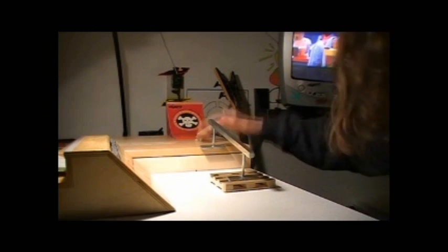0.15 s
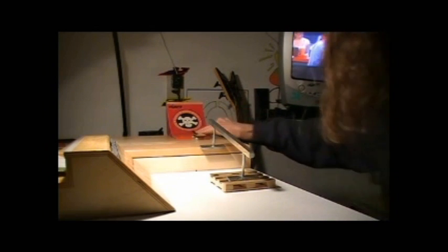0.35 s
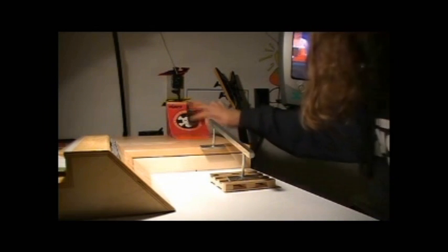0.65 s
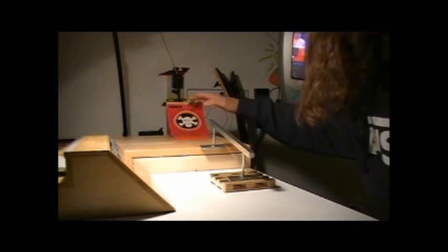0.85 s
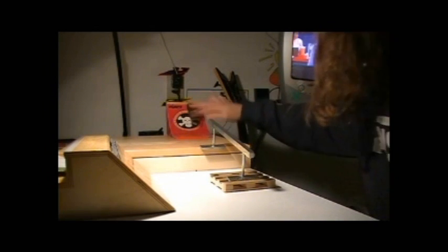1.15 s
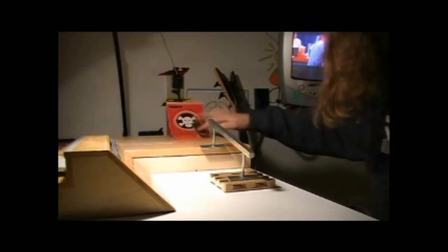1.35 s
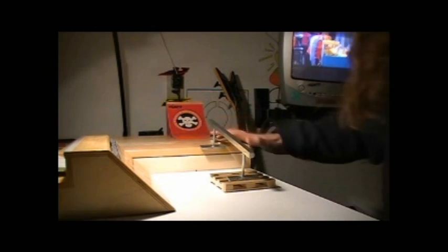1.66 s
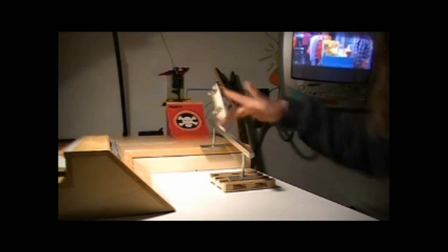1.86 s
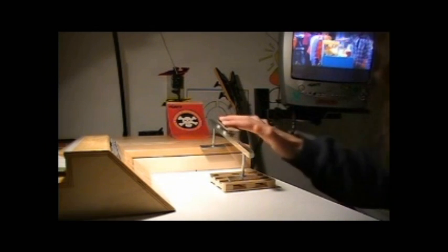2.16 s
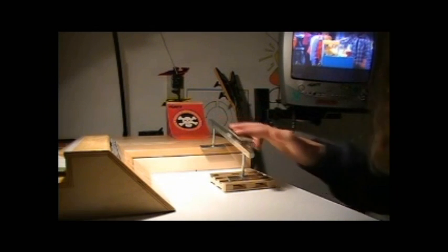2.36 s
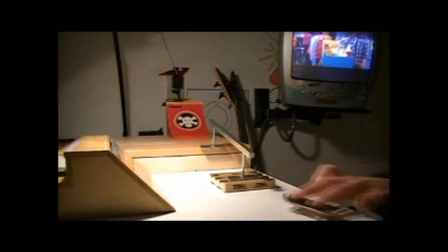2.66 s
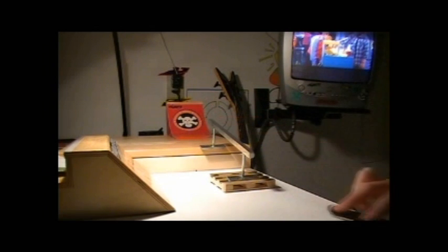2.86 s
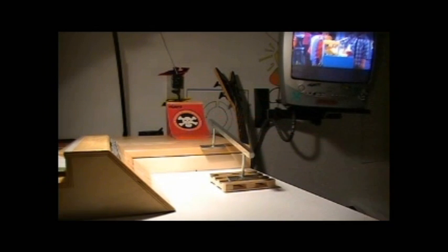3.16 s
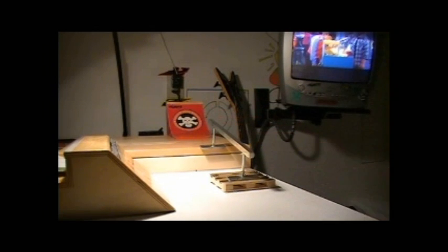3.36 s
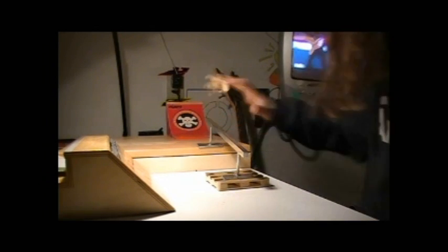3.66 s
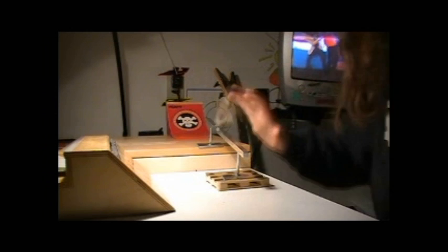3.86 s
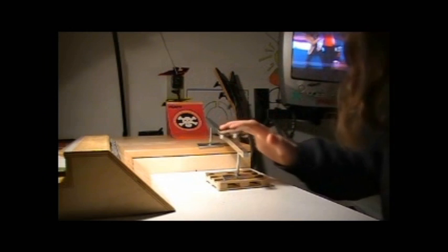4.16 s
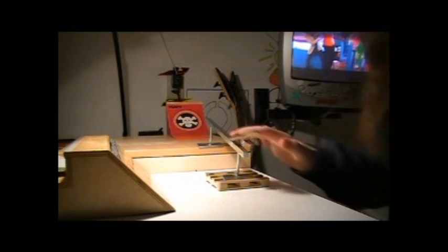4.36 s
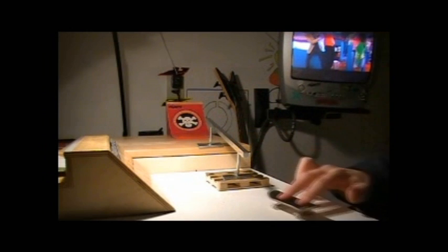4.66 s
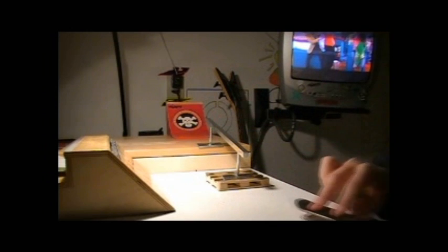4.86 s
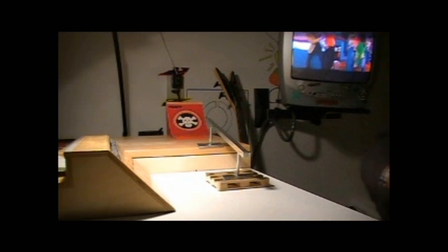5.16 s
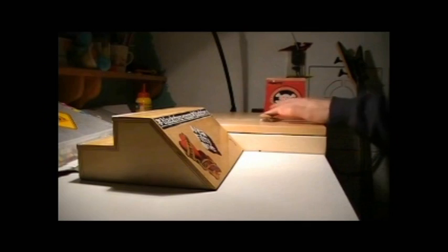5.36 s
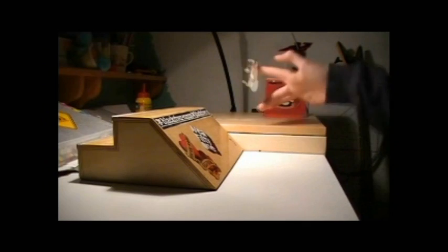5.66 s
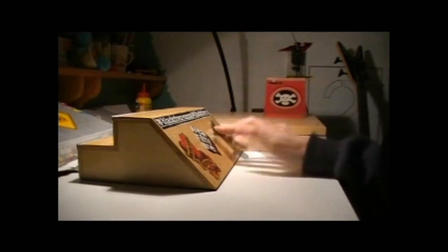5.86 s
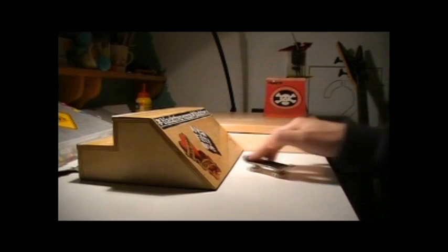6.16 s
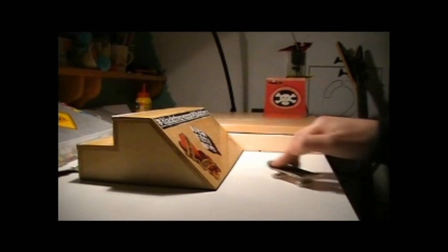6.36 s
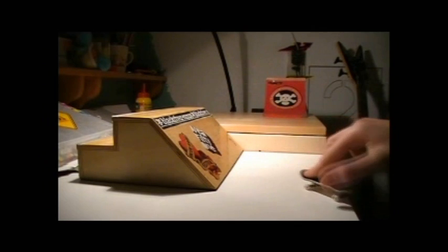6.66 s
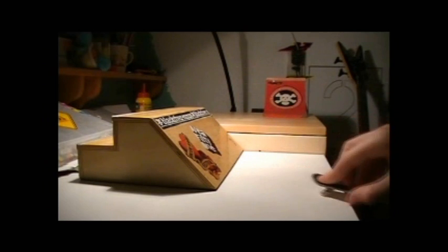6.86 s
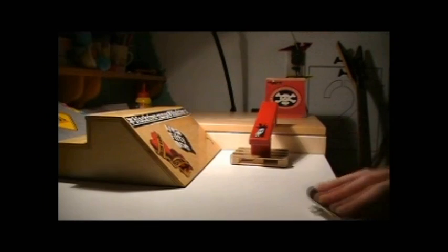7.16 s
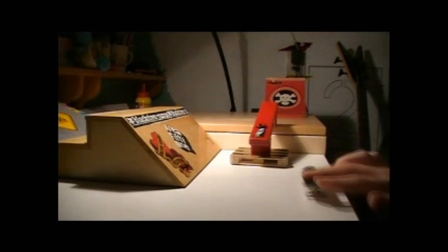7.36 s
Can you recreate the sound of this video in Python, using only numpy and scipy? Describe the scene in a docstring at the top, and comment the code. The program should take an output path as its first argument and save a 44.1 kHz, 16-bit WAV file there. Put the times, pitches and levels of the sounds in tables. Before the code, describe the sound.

Finger-sized skateboard tricks: bright hard clicks, short wheel rumbles on wood, a small rail singing, hollow box knocks, and one abrupt cut near the end.

```python
"""Wheels of a finger-sized skateboard roll over hollow wooden boxes and a desk: grit rings wood, deck and trucks.
Trucks and deck edge scrape by stick-slip, and sharp clacks join a click, a bright rattle and a dull thud.
Trucks strike a small metal rail and make it sing; a ramp box and a ledge ring as struck modes.
Late on, the rolling and the room's tail break off abruptly.
A small room adds dying reflections over steady noise and a few thin tones."""
import sys
import numpy as np
from scipy import signal
from scipy.fft import rfft, irfft, next_fast_len
from scipy.io import wavfile

SR = 44100
rng = np.random.default_rng(int(sys.argv[2]) if len(sys.argv) > 2 else 0)


def pcm_store(signal):
    """Save signal as 16-bit PCM."""
    levels = np.round(np.clip(np.atleast_2d(signal), -1, 1) * 32767)
    wavfile.write(sys.argv[1], SR, levels.astype(np.int16).T)


N = 331191   # length [samples]
CUT_S = 7.064   # the rolling and the room's tail break off here

# Modes of the desk top, shaken by the rolling and by the clacks:
# (frequency [Hz], width [Hz], level relative to the wood under the rolling [dB])
DESK_MODES = [(105, 10, -29), (153.4, 22, -13), (208, 59, -18)]
# Stereo width, what differs left and right: (frequency [Hz], side minus mid [dB])
SIDE_SPECTRUM = [(60, -20), (150, -21), (500, -13.5), (1500, -17.5), (3800, -10), (4200, -62), (14000, -33)]


def from_db(db):
    """Logarithmic level: decibels to amplitude gain."""
    return 10 ** (np.asarray(db) / 20)


def rms_one(x):
    """Normalisation of mean power: scale to unit rms."""
    return x / np.sqrt(np.mean(x ** 2) + 1e-20)


def at_hz(points, hz):
    """Spectral envelope: interpolate levels in dB along a log-frequency axis."""
    points = np.array(points)
    return np.interp(np.log(hz), np.log(points[:, 0]), points[:, 1])


def coloured(x, spectrum):
    """Linear filtering: shape a steady noise by a spectrum; rms 1 over all channels together."""
    size = next_fast_len(N)
    hz = np.maximum(np.arange(size // 2 + 1) * SR / size, 1)
    shaped = irfft(rfft(x, size) * from_db(at_hz(spectrum, hz)), size)
    return rms_one(shaped[..., :N])


def resonance(x, hz, width_hz):
    """Forced damped oscillator: a two-pole band, unit rms."""
    radius = np.exp(-np.pi * width_hz / SR)
    poles = [1, -2 * radius * np.cos(2 * np.pi * hz / SR), radius * radius]
    return rms_one(signal.lfilter([1, 0, -1], poles, x))


def ring(clicks, hz, t60):
    """Free damped oscillation: a unit click sets a dying sine of initial height 1 ringing."""
    radius = from_db(-60 / (t60 * SR))
    angle = 2 * np.pi * hz / SR
    poles = [1, -2 * radius * np.cos(angle), radius * radius]
    return signal.lfilter([0, np.sin(angle)], poles, clicks + 1e-18)


def struck(blows, modes):
    """Modal superposition: every blow sets all modes of one object ringing."""
    clicks = np.zeros(N)
    for s, db in blows:
        clicks[int(s * SR)] = from_db(db)
    return sum(from_db(db) * ring(clicks, hz, t60) for hz, db, t60 in modes)


def grit(per_s, spread_db):
    """Random impulse excitation: sparse tiny bumps of uneven size; rms 1."""
    spread = from_db(spread_db * np.minimum(rng.exponential(1, N), 5))
    sizes = spread * rng.standard_normal(N)
    return rms_one(sizes * (rng.random(N) < per_s / SR))


def rolling():
    """Roughness excitation: grit shakes the panel under the board, the desk, the deck and the wheels."""
    # modes of boxes and desk: (frequency [Hz], width [Hz], level [dB])
    panel_modes = [(263.6, 31, 3), (338.7, 42, 2.5), (398, 31, 2), (478.6, 76, 3.5), (564, 31, 1.5),
                   (654, 57, 1), (762, 42, 5), (853, 27, 3)]
    # modes of the deck: (frequency [Hz], width [Hz], level [dB])
    deck_modes = [(984, 102, 5), (1205, 130, 3.5), (1440, 110, 4), (1517, 44, 0.5), (1647, 157, 1),
                  (2035, 220, 6), (2505, 220, 3)]
    # hiss of the wheels: (frequency [Hz], relative level per Hz [dB])
    wheel_spectrum = [(1290, -15.5), (2200, -3.5), (3640, 7), (5080, 1), (6610, 4.5), (7250, 1), (8270, 2),
                      (9140, -2), (10800, -17), (12200, -55.5), (12600, -38), (13700, -75), (14000, -84)]
    wood_follows, deck_follows = .65, .8   # share of the wheels' swell and fade, in dB
    desk_softer_s, desk_softer_db = 5.33, -8.0   # from here on the desk hums less under the rolling

    t, under, (wood_db, wood_hz, deck_db, deck_hz, wheel_db) = motion()
    wood_power = from_db(2 * (wood_db - wood_follows * under)) + 1e-30
    deck_power = from_db(2 * (deck_db - deck_follows * under)) + 1e-30
    wheel_power = from_db(2 * (wheel_db - under)) + 1e-30

    def smooth(values):
        """Linear interpolation from the motion's time steps to samples."""
        return np.interp(np.arange(N) / SR, t, values)

    def pitch(power, hz):
        """Power-weighted mean: the loudest motion sets the pitch."""
        return smooth(np.sum(power * hz, 0) / np.sum(power, 0))

    def level(power):
        """Incoherent addition: powers of all motions add."""
        return smooth(np.sqrt(np.sum(power, 0)))

    bumps = grit(per_s=2500., spread_db=1.0)
    fine = grit(per_s=12000., spread_db=1.5)
    wood = body(bumps, panel_modes, pitch(wood_power, wood_hz), focus_db=12.5, rest_db=8.0)
    desk_gain = from_db(desk_softer_db * (np.arange(N) > desk_softer_s * SR))
    desk = sum(from_db(db) * resonance(bumps, hz, width) for hz, width, db in DESK_MODES)
    wood = wood + desk_gain * desk
    deck = body(bumps, deck_modes, pitch(deck_power, deck_hz), focus_db=35.0, rest_db=7.5)
    wheels = coloured(fine, wheel_spectrum)
    return level(wood_power) * wood + level(deck_power) * deck + level(wheel_power) * wheels


def motion():
    """Exponential growth and decay: dB under each motion's loudest moment, with its levels and pitches."""
    # Rolls, slides and sudden contacts that run on; at 3.426 s and 5.329 s the rolling sets in at full level at
    # once: (loudest time [s], wheels' time to gain the last 20 dB [s], run-on until lift-off [s], wood level
    # [dB], wood pitch [Hz], deck level [dB], deck pitch [Hz], wheel level [dB])
    run_ons = [(0.03, .3, .06, -56, 270, -55, 2300, -27), (0.44, .12, .25, -24, 310, -34.5, 1050, -42),
               (0.88, .1, .3, -59, 480, -66, 1300, -61), (1.18, .08, .012, -42, 480, -44, 1300, -56),
               (1.428, .15, .1, -22, 414, -34, 1310, -33), (1.62, .25, .07, -38, 705, -29, 1440, -33),
               (2.47, .22, .05, -53, 627, -38.5, 2360, -23), (2.75, .1, .25, -49, 460, -41, 1620, -44),
               (3.04, .08, .03, -42, 636, -39, 1370, -32.5), (3.066, .004, .09, -33, 530, -40, 1450, -31),
               (3.25, .1, .18, -50, 380, -54, 1750, -53), (3.426, .001, .14, -36, 600, -28, 1420, -34),
               (3.91, .004, .1, -42, 450, -38, 2300, -25), (4.2, .1, .2, -58, 500, -56, 1250, -50),
               (4.4, .25, .012, -66, 400, -66, 1400, -43.5), (4.43, .004, .1, -65, 500, -52, 2150, -31),
               (4.92, .17, .13, -45, 420, -31, 1480, -42), (5.09, .2, .045, -50, 450, -29, 1450, -45),
               (5.14, .25, .09, -39, 450, -34, 2100, -32), (5.329, .001, .14, -32.5, 750, -28, 1150, -34),
               (5.99, .06, .04, -40, 450, -29, 1550, -38), (6.28, .2, .25, -52, 550, -40, 1200, -50),
               (6.58, .15, .12, -43, 520, -44, 1500, -48), (6.96, .13, .02, -40, 700, -40, 1390, -38),
               (7.0, .004, .07, -36, 320, -47, 1700, -43), (7.43, .24, .03, -39, 730, -30.5, 2050, -26)]
    # Landings, the board rattles out: (time [s], wheels' time to lose 20 dB [s],
    # wood level [dB], wood pitch [Hz], deck level [dB], deck pitch [Hz], wheel level [dB])
    landings = [(0.174, .175, -17.5, 665, -16, 1400, -16), (0.734, .1, -24, 417, -34, 1340, -44),
                (1.198, .11, -21.5, 620, -23.5, 1010, -25.5), (1.728, .17, -32.5, 450, -36.5, 1520, -27.5),
                (1.972, .25, -40, 450, -35, 1900, -22.5), (2.59, .25, -42, 650, -38, 1710, -29.5),
                (3.578, .12, -28.5, 500, -32, 1900, -23.5), (4.545, .25, -39, 550, -32, 1650, -31),
                (5.548, .12, -26, 520, -26, 1420, -21.5), (5.852, .14, -28, 350, -20.5, 1600, -16),
                (6.03, .24, -36, 550, -28, 1400, -33.5), (6.78, .11, -50, 425, -39, 2100, -32.5),
                (7.105, .5, -56, 400, -66, 1500, -48)]
    run_on_sag_db, lifted_db_per_s = 6.0, 240.   # slowing down, then in the air

    t = np.arange(0, N, 32) / SR
    under = [np.where(t < s, 200, 20 * (t - s) / fade) for s, fade, *_ in landings]
    for s, rise, run, *_ in run_ons:
        slowing = run_on_sag_db * np.minimum((t - s) / run, 1)
        lifted = lifted_db_per_s * np.maximum(t - s - run, 0)
        swell = np.where(t < s, 20 * (s - t) / rise, slowing + lifted)
        broken_off = (s < CUT_S) & (t > CUT_S)
        under.append(swell + 200 * broken_off)
    settings = np.array([row[-5:] for row in landings + run_ons])
    return t, np.array(under), settings.T[:, :, None]


def body(bumps, modes, loudest_hz, focus_db, rest_db):
    """Modal coupling: modes near the pitch of the part under the wheels sound most; rms about 1."""
    gains, rings = [], []
    for k, (hz, width, db) in enumerate(modes):
        octaves = np.log2(hz / loudest_hz)
        gains.append(from_db(db - np.minimum(focus_db * octaves ** 2, rest_db)))
        rings.append(resonance(bumps, hz, width) * (-1) ** k)   # neighbouring modes in opposite phase
    total = sum(gain * tone for gain, tone in zip(gains, rings))
    return total / np.sqrt(sum(gain ** 2 for gain in gains))


def scrapes():
    """Stick-slip friction: grains swell and fade in the bands of the parts that rub."""
    # Trucks and deck edge: (start [s], loudest time [s], end [s], level of each band [dB],
    # three ringing bands [Hz, Hz, Hz])
    rubs = [(-.03, 0.035, .14, -24.5, 3720, 5200, 8070), (1.377, 1.402, 1.68, -33, 2780, 3560, 1880),
            (1.535, 1.6, 1.62, -26, 2010, 1280, 3700), (2.298, 2.34, 2.36, -32, 4170, 5550, 8000),
            (2.4, 2.465, 2.53, -23, 3030, 5630, 7400), (2.974, 3.023, 3.06, -38, 4370, 1320, 7600),
            (3.9, 3.934, 4.14, -29.5, 3860, 5680, 6230), (4.85, 5.17, 5.23, -32, 3400, 3850, 4450),
            (6.15, 6.5, 6.8, -53, 3700, 3300, 4200), (6.895, 6.948, 7.0, -36, 3600, 910, 1510),
            (7.33, 7.438, 7.53, -31, 3240, 6760, 2200)]
    slips = grit(per_s=4300.0, spread_db=2.0)
    t, out = np.arange(N) / SR, 0
    for start, loudest, end, db, *bands in rubs:
        swell = np.interp(t, [start, loudest, end], [0, 1, 0]) ** 1.32
        # a narrow band inside a broad one
        ringing = sum(resonance(resonance(slips, hz, 0.06 * hz), hz, 1.0 * hz) for hz in bands)
        out = out + from_db(db) * swell * ringing
    return out


def clacks():
    """Impact of rigid bodies: a hard click, a bright rattle dying in milliseconds and a duller wood thud."""
    # Contacts of deck, wheels and trucks: (time [s], relative level [dB], thud relative to it [dB])
    contacts = [(0.172, 6, -28.5), (0.1963, -4, -3.5), (0.5904, -19, -24), (0.682, -27, -20),
                (0.7325, -20, -2), (0.9647, -51, 7.5), (1.1954, -10, 1), (1.3872, -26, 2),
                (1.3987, -16, -5), (1.479, -19, 9), (1.725, -4, -46), (1.9674, -10, -45), (1.971, 1.5, -55),
                (1.9894, -3, -46), (2.12, -24, -30), (2.1779, -22, -31), (2.338, -18, -30),
                (2.429, -6, -32), (2.582, 0, -29), (2.585, 7, -29), (2.5933, -7.5, -27),
                (3.061, -3.5, -20.5), (3.1005, -10, -12), (3.12, -16, -12), (3.1575, -14.5, -14),
                (3.4256, -44, 4), (3.5757, -2, -39), (3.8844, 2, -31), (3.908, -1, -37), (3.9149, 0, -52),
                (3.9254, -6, -26), (3.933, 0, -33), (4.4142, -2, -39), (4.439, -15, -38), (4.5364, 5, -35),
                (4.5402, 4.5, -22), (5.003, -18, -20), (5.031, -18, -15), (5.049, -18, -20),
                (5.1106, -10, -20), (5.1204, -20, -3.5), (5.1684, -5.5, -45), (5.21, -20, -8),
                (5.39, -21, -20), (5.5441, 0, -36), (5.841, -20, -20), (5.8488, -2, -26), (5.8508, 2, -38),
                (5.8627, -5.5, -33), (5.8734, -10, -2.5), (6.0359, -1, -16), (6.0776, -14, -13.5),
                (6.775, -5, -36), (6.8079, -9, -19.5), (6.9711, -34, -21), (6.9898, 0.5, -22.5),
                (7.1028, 3, -28.5), (7.1419, 0, -51), (7.2104, -19, -21), (7.236, -26.5, -6),
                (7.2557, -15, -10)]
    # Colour of the rattle: (frequency [Hz], relative level per Hz [dB])
    rattle_spectrum = [(530, -25), (900, -18), (1880, -14.5), (4980, -2.5), (6720, 5), (7890, -1),
                       (9810, -5), (13200, -31), (14000, -29)]
    rattle_t60_s, thud_t60_s, boom_t60_s = .01, 0.032, 0.62

    out, clicks = np.zeros(N + SR), np.zeros(N)
    t = np.arange(SR // 8) / SR
    bright = coloured(rng.standard_normal(N), rattle_spectrum)
    dull = resonance(rng.standard_normal(N), 700, 1300)
    for s, contact_db, thud_db in contacts:
        i = int(s * SR)
        clicks[i] = from_db(contact_db + 0.5)
        since = t[:N - i]
        rattle = bright[i:i + len(t)] * from_db(-7.0 - 60 * since / rattle_t60_s)
        thud = dull[i:i + len(t)] * from_db(thud_db - 0.5 - 60 * since / thud_t60_s)
        out[i:i + len(rattle)] += from_db(contact_db) * (rattle + thud)
    click_band = signal.butter(1, [2500., 11000.], "band", fs=SR, output="sos")
    snap = signal.sosfilt(click_band, clicks)
    # the second wheel of the axle lands a moment later, with opposite sign
    snap = snap - 0.79 * np.roll(snap, int(.0013 * SR))
    # the desk top hums after each blow, all modes equally
    boom = sum(ring(clicks, hz, boom_t60_s) for hz, width, db in DESK_MODES)
    return out[:N] + snap + from_db(-55.5) * boom


def rail():
    """Modal vibration of a metal bar: modes struck by the trucks, and thin tones that sing as they slide."""
    # The rail sings while the trucks slide: (start [s], length [s], level before the sag [dB])
    singing = [(0.03, .17, -27), (0.37, .08, -43), (2.44, .155, -31), (4.41, .145, -38)]
    # Tones of the song: (frequency [Hz], relative level [dB])
    song_tones = [(4107, -9), (6699, 3.5), (8737, -16)]
    # Trucks meet the rail: (time [s], level [dB])
    rail_blows = [(1.969, -48), (2.432, -31), (3.882, -45), (3.912, -31), (4.414, -50), (4.439, -46)]
    # Struck modes: (frequency [Hz], relative level [dB], decay time T60 [s])
    rail_modes = [(2541, 0, .6), (3752, -3, .4), (4107, -7, .5), (9238, -16, .35), (11640, -22, .2)]
    attack_s, sag_db_per_s = .045, 55.   # while the trucks slide
    drop_db, drop_s, tail_db_per_s = 12., .03, 52.   # after the slide

    t, level = np.arange(N) / SR, 0
    for s, length, db in singing:
        since_end = np.maximum(t - s - length, 0)
        sag = sag_db_per_s * np.clip(t - s, 0, length)
        drop = drop_db * np.minimum(since_end / drop_s, 1)
        fade_db = sag + drop + tail_db_per_s * since_end
        attack = np.clip((t - s) / attack_s, 0, 1)
        level = level + attack * from_db(db - fade_db)
    song = sum(from_db(db) * np.sin(2 * np.pi * (hz * t + rng.random())) for hz, db in song_tones)
    return struck(rail_blows, rail_modes) + np.sqrt(2) * level * song


def ramp():
    """Modal ringing of a hollow box: the tail pops off the ramp."""
    # Pops: (time [s], level [dB])
    ramp_blows = [(5.545, -19.5), (5.575, -32), (5.61, -23)]
    # Modes of the box: (frequency [Hz], relative level [dB], decay time T60 [s])
    ramp_modes = [(405, -9.5, 0.39), (469, -2, 0.25), (664, -6, 0.36), (748, -3.5, 0.35)]
    return struck(ramp_blows, ramp_modes)


def ledge():
    """Modal ringing of coupled bodies: board and ledge sound together on landing and bounces."""
    # Landing and bounces: (time [s], level [dB])
    ledge_blows = [(5.85, -24.5), (5.871, -28.5), (5.93, -32), (6.0, -30.5), (6.036, -33), (6.13, -38)]
    # Modes of board and ledge: (frequency [Hz], relative level [dB], decay time T60 [s])
    ledge_modes = [(339, 4, 0.23), (854, -6, 0.3), (910, -9, 0.3), (1510, 5.5, 0.16)]
    return struck(ledge_blows, ledge_modes)


def room(x):
    """Diffuse reverberation: dense dying reflections; the left-right difference has a colour of its own."""
    wet_t60_s, wet_db, side_t60_s = 0.12, -8.5, 0.027
    t = np.arange(int(.4 * SR)) / SR
    echoes = rng.standard_normal(len(t)) * from_db(-60 * t / wet_t60_s) * (t > .004)
    echoes = echoes / np.sqrt(np.sum(echoes ** 2))
    wet = from_db(wet_db) * signal.fftconvolve(x, echoes)[:N]
    early = rng.standard_normal(len(t)) * from_db(-60 * t / side_t60_s)
    early = early / np.sqrt(np.sum(early ** 2))
    side = signal.fftconvolve(x, early)[:N]
    side = side + 0.088 * x   # all close sounds lean a little to the left
    hz = np.maximum(np.arange(N // 2 + 1) * SR / N, 1)
    side = irfft(rfft(side) * from_db(at_hz(SIDE_SPECTRUM, hz)), N)
    return wet + side * np.array([[1], [-1]])


def air():
    """Stationary random noise: room and microphone noise in mid and side, and a few thin pure tones."""
    # Colour of the noise: (frequency [Hz], relative level per Hz [dB])
    air_spectrum = [(18, -49), (30, -23.5), (122, 5.5), (253, 1), (593, -6.5), (1360, -1.5), (2130, -10.5),
                    (3690, -19.5), (8880, -50), (10300, -35.5), (12000, -30), (15600, -88), (22000, -120)]
    # Thin steady tones near the microphones: (frequency [Hz], peak level [dB])
    whine = [(2315, -65.5), (4420, -66.5), (7138, -65)]
    mid, side = coloured(rng.standard_normal((2, N)), air_spectrum)
    side = coloured(side, SIDE_SPECTRUM)   # rms 1 again, so as strong as the mid
    tones = sum(from_db(db) * np.sin(2 * np.pi * hz * np.arange(N) / SR) for hz, db in whine)
    return from_db(-56) * (mid + side * np.array([[1], [-1]])) + tones


def scene():
    """Superposition: close sources, their room and the air; the room's tail also breaks off at CUT_S."""
    close = rolling() + scrapes() + clacks() + rail() + ramp() + ledge()
    before = np.arange(N) < CUT_S * SR
    return close + before * room(close) + room(close * ~before) + air()


def record(dry):
    """Band limiting and saturation: the deepest bass is lost, peaks are rounded, the top is cut."""
    bass_cut = signal.butter(1, 60., "high", fs=SR, output="sos")
    top_cut = signal.cheby2(12, 70, 14400, fs=SR, output="sos")   # 70 dB down from 14400 Hz up
    dry = signal.sosfilt(bass_cut, dry)
    rounded = 0.75 * np.tanh(dry / 0.87)
    return signal.sosfilt(top_cut, rounded)


dry = scene()
out = record(dry)
pcm_store(out)
```